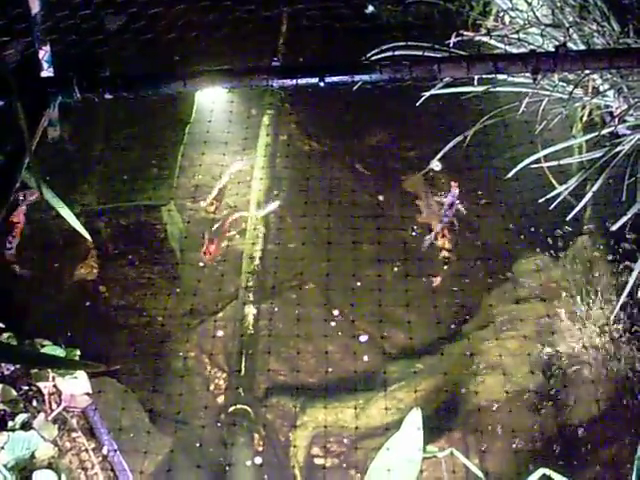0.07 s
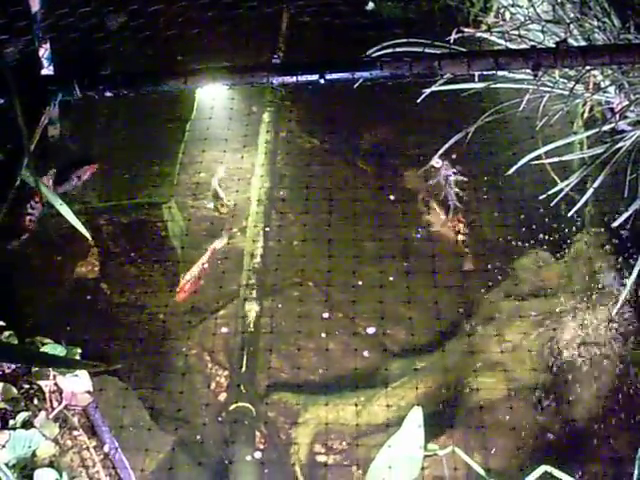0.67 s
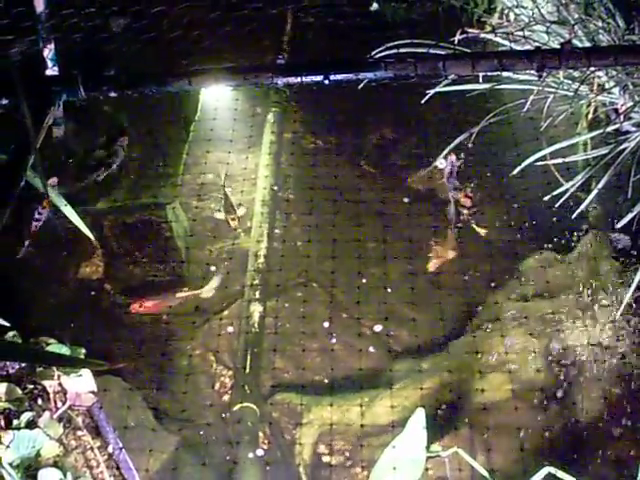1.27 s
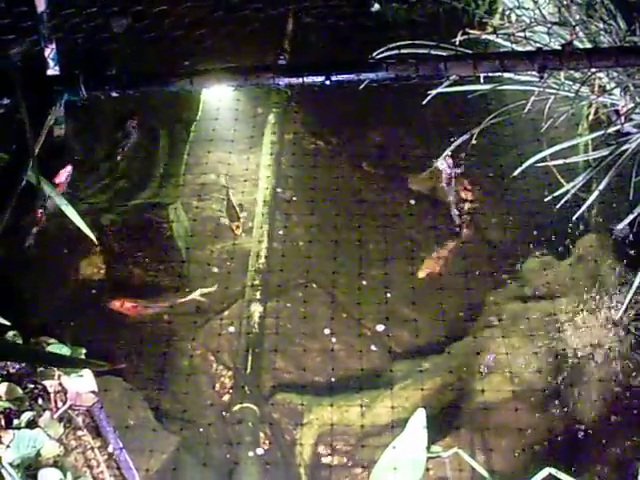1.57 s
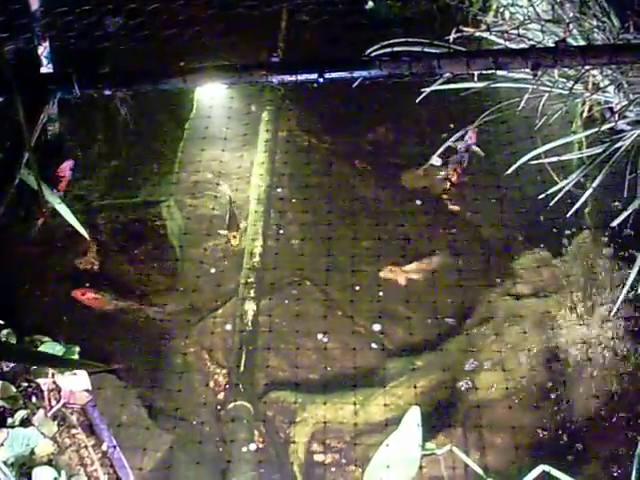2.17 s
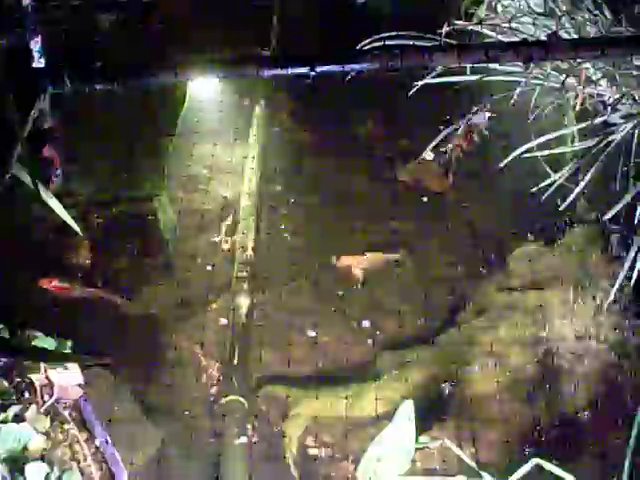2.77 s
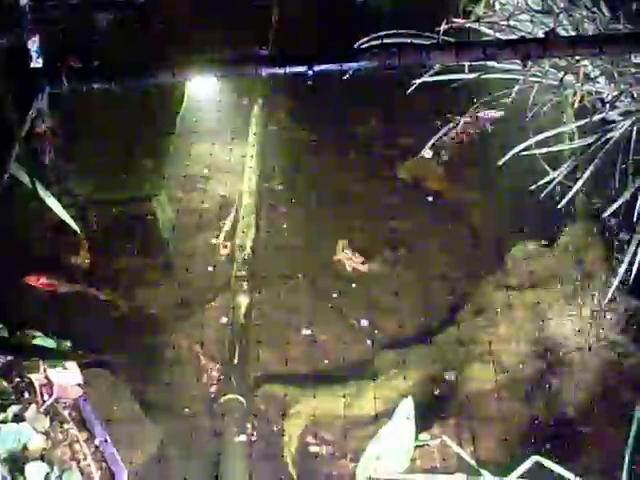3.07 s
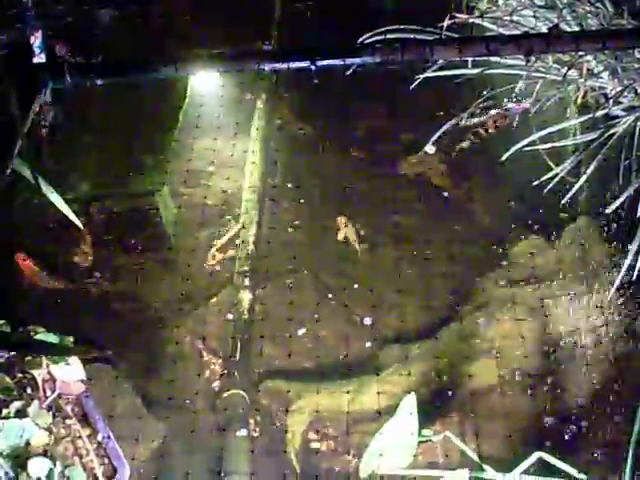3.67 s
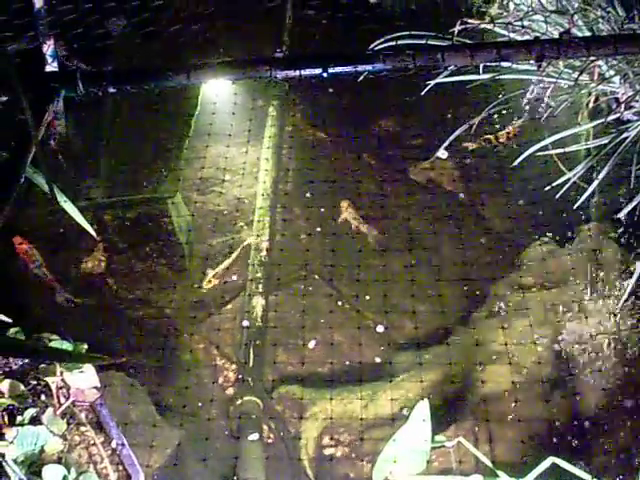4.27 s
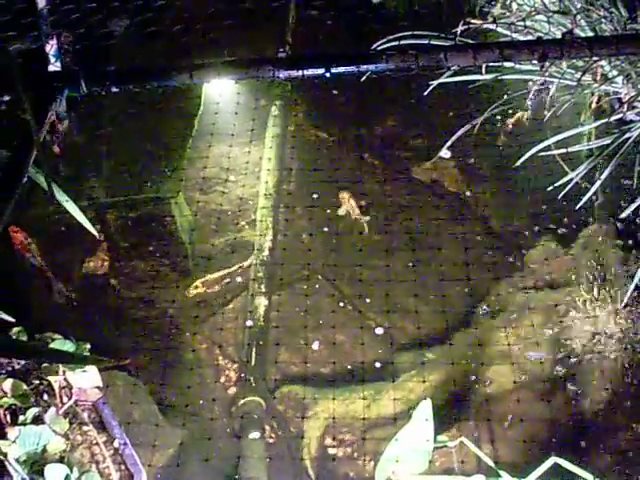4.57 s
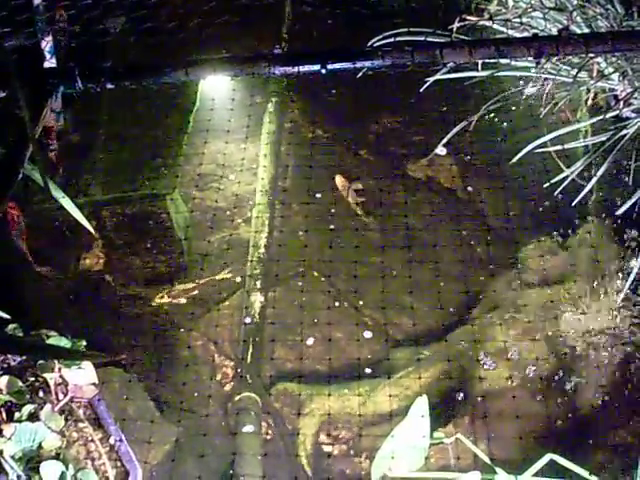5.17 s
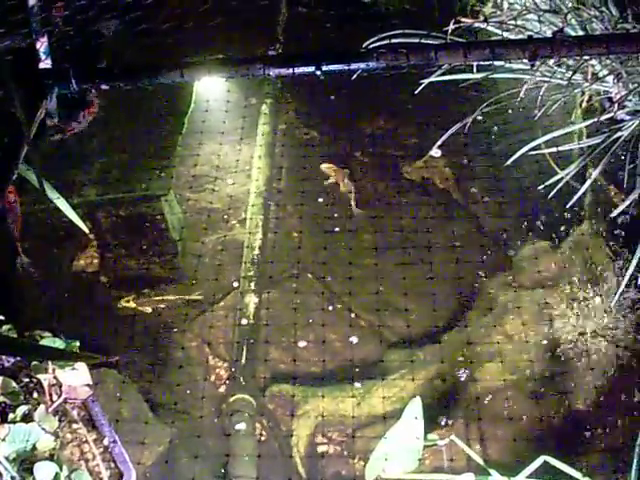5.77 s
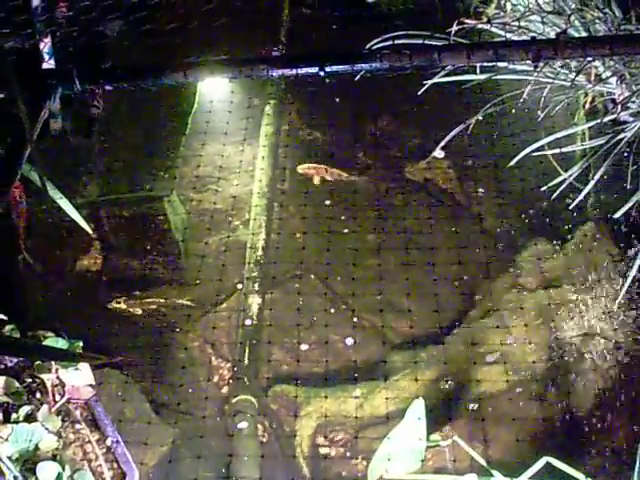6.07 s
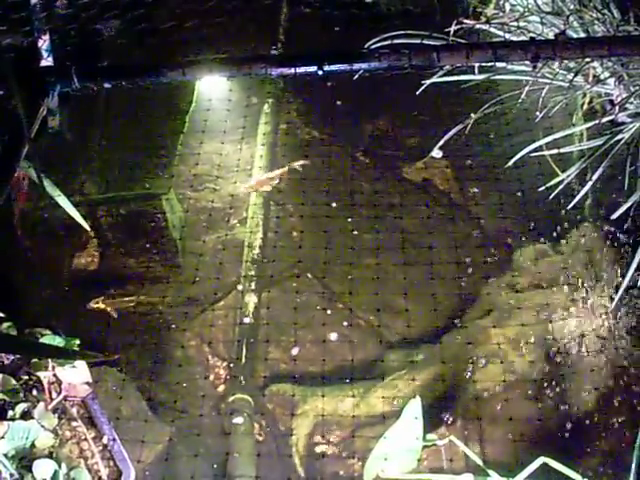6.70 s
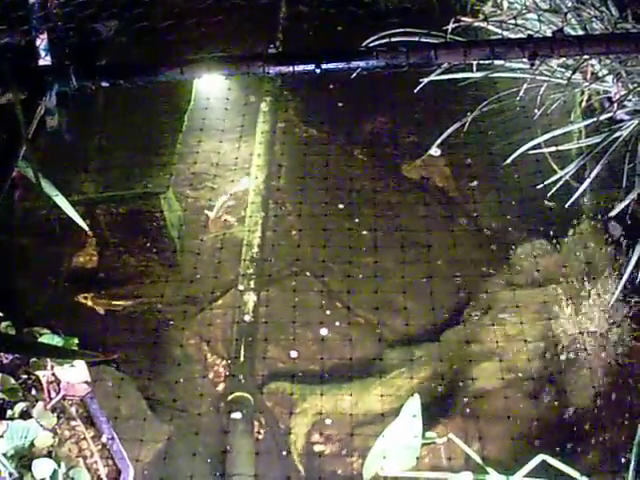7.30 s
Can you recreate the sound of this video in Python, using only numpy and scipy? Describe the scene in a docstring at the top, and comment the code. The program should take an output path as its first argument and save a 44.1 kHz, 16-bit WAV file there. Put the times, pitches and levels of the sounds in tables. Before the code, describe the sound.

A frog calls at a garden pond at night, over the soft hiss of trickling water and the faint low hum and rumble of a pump. From the start to about 1.6 seconds it gives four harsh, pitched croaks, half a second apart, with softer croaks and thin, quiet moans between them. From about 1.9 seconds the calls turn into short, rough rattles, eight in all, roughly every half second, each closing in a brief whine. The last three, from 4 seconds, are a little louder, and the final one ends near 5.3 seconds. The calls have only a faint outdoor reflection. The water and pump rise a little around 4 seconds, then clearly from 6 seconds, as if the microphone were turned up. Sharp drips and small ringing bubbles stand out of the trickle until the end at about 7.3 seconds.

```python
"""A garden pond at night, where a frog calls over trickling water and the hum of a pump.
The frog's vocal folds, beating about 790 times a second, drive the resonances of its throat and body.
At first they lock into a subharmonic, repeating every second beat (a croak) or every third (a thin
moan); later they rattle in chaotic bursts that relax into a short whine. The water sounds by drop
impacts and ringing bubbles. Water and pump grow louder at the end as the recorder's gain rises."""
import sys
import numpy as np
from scipy import signal
from scipy.io import wavfile
from scipy.ndimage import uniform_filter1d

SR = 44100
rng = np.random.default_rng(int(sys.argv[2]) if len(sys.argv) > 2 else 0)


def bounce(signal):
    """Save signal as a 16-bit WAV file at the path given by the first command-line argument."""
    frames = np.transpose(np.atleast_2d(signal))
    limited = np.clip(frames, -1, 1)
    pcm = np.round(limited * 32767).astype(np.int16)
    wavfile.write(sys.argv[1], SR, pcm)


N = 323694
TIME = np.arange(N) / SR

# Clear croaks, softer low croaks and thin moans. Each row: start, locking and release of the folds
# in seconds, nominal pitch in Hz, level in dB.
CLEAR_CROAKS = [(-.04, 0.025, 0.099, 399, -27.5), (.491, 0.544, 0.62, 401, -26.5),
                (1.029, 1.079, 1.154, 400, -26), (1.5, 1.553, 1.626, 400.7, -27)]
SOFT_CROAKS = [(.19, .228, 0.334, 378.5, -33), (.722, .768, .864, 378.2, -33)]
THIN_MOANS = [(.335, .352, 0.47, 267.6, -44), (.862, .882, .98, 271.6, -45.5),
              (.95, .985, 1.04, 255.7, -45.5), (1.255, 1.322, 1.42, 273.8, -45.5),
              (1.77, 1.8, 1.875, 271.3, -47), (2.215, 2.288, 2.37, 269.7, -46.5)]
# Rattling calls. Each row: start and length in seconds, nominal bursts per second, relative level in dB,
# starting pitch of the closing whine in Hz.
RATTLE_CALLS = [(1.901, 0.15, 54.8, -29.5, 810), (2.349, 0.17, 50, -29, 850), (2.737, 0.15, 48, -30.5, 830),
                (3.129, 0.17, 52.2, -31, 833), (3.563, 0.19, 50, -31.5, 819), (3.96, 0.17, 51.8, -25, 824),
                (4.444, 0.19, 50.3, -27.5, 824), (5.08, 0.19, 50.6, -26, 816)]
# Soft hums around the low croaks. Each row: start and length in seconds, pitch in Hz, level in dB.
FOLD_HUMS = [(0.176, 0.066, 750, -49.5), (0.332, 0.11, 747, -50.5), (0.708, .07, 754, -47.5),
             (0.848, 0.081, 747, -57)]
# Grunts that open some moans. Each row: start and length in seconds, relative level in dB.
SOFT_GRUNTS = [(0.925, 0.043, -57), (1.25, 0.063, -50), (2.213, 0.063, -51.5)]
# Spectra of the voices. Each row: harmonic number, relative level in dB.
CLEAR_SPECTRUM = [(1, -40.5), (2, -18.5), (3, -18.5), (4, -20), (5, -27.5), (6, -6), (7, 3), (8, -17.5),
                  (9, -7.5), (10, -25.5), (11, -21), (12, -19), (13, -21.5), (14, -26.5), (15, -22),
                  (16, -22.5), (17, -18.5), (18, -24), (19, -25), (20, -63.5), (21, -34.5)]
SOFT_SPECTRUM = [(1, -38), (2, -9), (3, -11), (4, -25), (5, -21), (6, -3), (7, 3), (8, -9.5), (9, -13.5),
                 (10, -30), (11, -15.5), (12, -24), (13, -23), (14, -26), (15, -34.5), (16, -16), (17, -24),
                 (18, -35), (19, -34), (20, -35)]
MOAN_SPECTRUM = [(1, -38.5), (2, -17.5), (3, 4.5), (4, -6), (5, -18.5), (6, -12.5), (7, -11.5), (8, -1.5),
                 (9, -13.5), (10, 1.5), (11, 3.5), (12, -7), (13, -16), (14, -8), (15, -35), (16, -16),
                 (17, -15), (18, -21.5), (19, -48.5), (20, -39), (21, -38.5), (22, -14), (23, -45),
                 (24, -15), (25, -9), (26, -51), (27, -31)]
WHINE_SPECTRUM = [(1, -5), (2, 1.5), (3, 7), (4, 1), (5, -26.5), (6, -6), (7, -16.5), (8, -4.5), (9, -35)]
# Tones held through a rattle. Each row: multiple of half the fold rate, relative level in dB.
HELD_SPECTRUM = [(2, -2), (3, -13), (4, -6.5), (6, -1.5), (7, 3.5), (9, -3.5), (17, -8.5)]
# Stationary resonances of throat and body. Each row: centre in Hz, width in Hz, gain in dB.
BODY_RESONANCES = [(815, 150, -18), (1000, 300, -9), (1300, 330, -16), (1585, 170, -17), (2360, 240, -9),
                   (2740, 220, -3), (3000, 300, -16), (3620, 240, -10), (4650, 700, -22), (5900, 900, -21),
                   (6700, 240, -14), (7400, 450, -21)]
# Level of the water and pump hum; both grow louder together as the recorder's gain rises.
# Each row: time in seconds, relative level in dB.
BACKGROUND_LEVEL = [(0, -9.5), (2, -9.5), (3.5, -11), (4.2, -5), (5.5, -5.5), (6.1, 4), (6.8, 5.5),
                    (7.34, 8.5)]
# Spectra of the water's wash, its splashes and the rumble. Each row: frequency in Hz, gain in dB.
WASH_SPECTRUM = [(90, -9), (190, 7), (300, 3), (470, 7), (650, 0.5), (900, 1.5), (1300, -0.5), (1600, -1.5),
                 (3150, -1), (4400, -5.5), (4900, 0), (5500, 0), (7400, 2), (8700, -18)]
SPLASH_SPECTRUM = [(300, -11), (500, -0.5), (1000, 0), (1300, -4), (1650, 0.5), (1900, -4), (2700, 0.5),
                   (3200, -4.5), (3800, 2.5), (4400, -3), (4850, 5), (5500, -7.5), (7300, -1.5),
                   (8500, -10.5)]
RUMBLE_SPECTRUM = [(15, -5.5), (30, 4), (70, -2.5), (150, -8.5), (300, -19), (600, -39.5), (1500, -49)]
# Large drops. Each row: start in seconds, relative peak level in dB, resonance in Hz.
LARGE_DROPS = [(1.2435, -44, 2260), (2.1226, -46, 3220), (2.6103, -42, 4800), (3.3502, -43, 4820),
               (4.9594, -37, 1640), (5.4215, -43, 5270), (5.5997, -39, 3670), (5.77, -37, 3600),
               (6.0739, -30, 2790), (6.1556, -30.5, 3700), (6.341, -26, 4900), (6.5635, -29.5, 6450),
               (6.9102, -30.5, 2050), (7.1026, -27.5, 1620), (7.2474, -25, 4870)]
# Single bubbles. Each row: start in seconds, pitch in Hz, level in dB, time to decay 60 dB in seconds.
RINGING_BUBBLES = [(3.85, 546, -49.5, 0.15), (4.353, 1590, -28.5, 0.013), (4.956, 1630, -39, 0.022),
                   (5.494, 6160, -44, 0.13), (5.55, 510, -36, 0.036), (6.084, 6160, -42, 0.061),
                   (6.162, 454, -37, 0.079), (6.17, 743, -30, .032), (6.252, 2810, -34, .034),
                   (6.5, 2210, -28.5, 0.013), (6.82, 2190, -35, .025), (6.912, 2030, -33.5, 0.035),
                   (7.06, 466, -31, 0.088), (7.1, 1520, -36, .055), (7.222, 4280, -36, .048),
                   (7.265, 480, -32, 0.035)]
# Hum of the pump. Each row: multiple of the mains frequency, relative level in dB.
PUMP_HARMONICS = [(2, -53.5), (3, -73), (4, -60.5), (6, -60.5), (8, -69), (16, -69.5)]


def locked_calls(calls, spectrum, waver, hoarse, scoop, sag_per_s, bloom, onset_db, fade_db_per_s,
                 release_db_per_s, creak_db, shut_hz, open_hz, settle_s=0.016, lock_s=0.036, sac_hz=2930):
    """Mode locking: on one push of air the folds creak, lock into a periodic tone, then creak again."""
    out = np.zeros(N)
    for start, lock, release, hz, db in calls:
        t = start + TIME[:SR // 4]
        swell = np.clip((t - start) / (lock - start), 0, 1)
        held_s, released_s = np.maximum(t - lock, 0), np.maximum(t - release, 0)
        fade_db = fade_db_per_s * held_s + release_db_per_s * released_s
        level = amp(db + onset_db * (1 - swell) ** 2 - fade_db)
        locked = ramp(t - lock, lock_s) * ramp(release - t, lock_s)
        loose = np.exp(-held_s / settle_s)
        pitch = hz * (1 - scoop * loose - sag_per_s * held_s)  # scoops up, then sags
        tone = harmonics(pitch, spectrum, waver + hoarse * loose)
        arch = np.sin(np.pi * np.minimum(held_s / (release - lock), 1)) ** 2
        tone += bloom * (arch - 0.5) * resonate(tone, sac_hz, 500)  # brightest in mid-call
        knocks = amp(creak_db) * creak(t, shut_hz + (open_hz - shut_hz) * swell)
        add(out, start, level * (np.sqrt(locked) * tone + np.sqrt(1 - locked) * knocks))
    return out


def rattles(fold_hz=784.9, gain_db=1.04, onset_db=-15, attack_s=0.019, fade_db=-15, release_s=0.012,
            swell_s=0.12, held_db=-10, held_depth=0.5, flutter_db=2, whine_db=-15, whine_lead_s=0.0055):
    """Chaotic oscillation: irregular fold pulses come in bursts over held tones, and a whine follows."""
    out, t = np.zeros(N), TIME[:SR // 4]
    main_hz = np.interp(t, [0, swell_s], [2488, 2810])  # the resonance climbs as the throat swells
    body_db = np.interp(t, [0, swell_s], [-7, 0])
    for start, length, per_s, db, whine_hz in RATTLE_CALLS:
        push = amp(onset_db * np.exp(-t / attack_s) + fade_db * (t / length) ** 4)
        push *= ramp(length + release_s / 2 - t, release_s)
        gate = bursts(t, per_s)
        hz = fold_hz * (1 + 0.0027 * drift(40, size=len(t)))
        pulses = fold_pulses(hz, jitter=0.069, spread_db=6)
        chaos = throat(pulses, main_hz, body_db, main_width=250, steady_s=0.0075, lowest_hz=916)
        held_level = amp(held_db + flutter_db * drift(150, size=len(t)))
        held = held_level * harmonics(hz / 2, HELD_SPECTRUM, waver=0.011)
        add(out, start, amp(db + gain_db) * push * (gate * chaos + gate ** held_depth * held))
        add(out, start + length - whine_lead_s, amp(db + whine_db) * whine(whine_hz))
    return out


def bursts(t, per_s, slowing=0.011, hurry_s=0.003, rise_s=0.0019, hold_s=0.02, ring_db=-11, ring_s=0.075):
    """Amplitude modulation: the folds pass air in slowing bursts that open sharply, hold and ring off."""
    k = np.arange(44)
    opens = k * (1 + slowing * k) / per_s - hurry_s * (k > 0)  # the first gap is shortened
    age = np.maximum(t - opens[opens < t[-1], None], 0)
    hold = np.exp(-(age / hold_s) ** 4)
    ring = amp(ring_db) * np.exp((hold_s - age) / ring_s)
    shape = np.minimum(age / rise_s, 1) * np.maximum(hold, ring)
    strength = amp(rng.standard_normal(len(k)))[:len(age), None]
    return (shape * strength).max(0)


def creak(t, main_hz, knock_hz=135, chatter_hz=785, chatter_db=-10):
    """Impulse excitation: unlocked folds ring the throat with slow, hard knocks over a weak chatter."""
    knocks = fold_pulses(knock_hz * (1 + 0.13 * drift(30, size=len(t))), jitter=0.06, spread_db=1)
    chatter = fold_pulses(chatter_hz * (1 + 0.0092 * drift(40, size=len(t))), jitter=0.057, spread_db=0)
    return throat(knocks + amp(chatter_db) * chatter, main_hz, body_db=-2.5, main_width=280, steady_s=0.011)


def whine(hz, length_s=0.034, sag=0.055, fade_db=10):
    """Free oscillation: as the pressure dies the folds swing on and the pitch sags."""
    t = np.arange(0, length_s, 1 / SR)
    progress = t / length_s
    level = amp(-fade_db * progress ** 2) * fades(t, 0.006, 0.004)
    return level * harmonics(hz * (1 - sag * progress), WHINE_SPECTRUM, waver=0.017)


def croak_tails(gain_db=-18, lead_s=0.011):
    """Period doubling ends: a clear croak closes with a faint whine at the full rate of the folds."""
    out = np.zeros(N)
    for _, _, release, hz, db in CLEAR_CROAKS:
        add(out, release - lead_s, amp(db + gain_db) * whine(2 * hz, length_s=0.04, sag=0.025, fade_db=7))
    return out


def hums():
    """Nearly sinusoidal motion: folds that barely touch give an almost pure tone."""
    out = np.zeros(N)
    for start, length, hz, db in FOLD_HUMS:
        t = np.arange(0, length, 1 / SR)
        tone = harmonics(np.full(len(t), hz), [(1, 0.0043), (2, -18)], waver=0.011)
        add(out, start, amp(db) * fades(t, 0.022, 0.025) * tone)
    return out


def grunts(start_hz=1950, end_hz=2650, low_hz=1050, low_db=-2, gain_db=4):
    """Formant glide: loose folds chatter through a resonance that climbs as the throat swells."""
    out = np.zeros(N)
    chatter = fold_pulses(np.full(N, 420.0), jitter=0.069, spread_db=3.5)
    for start, length, db in SOFT_GRUNTS:
        t = np.arange(0, length, 1 / SR)
        pulses = chatter[round(start * SR):][:len(t)]
        voice = resonate(pulses, np.geomspace(start_hz, end_hz, num=len(t)), 500)
        voice += amp(low_db) * resonate(pulses, low_hz, 400)
        add(out, start, amp(db + gain_db) * unit_rms(voice) * fades(t, 0.04, 0.012))
    return out


def harmonics(hz, spectrum, waver, shimmer=9, lag_s=0.0012):
    """Fourier series: periodic folds give wavering harmonics; strong ones, near resonances, lag a little."""
    jitter, flutter = unit_rms(uniform_filter1d(rng.standard_normal((2, len(hz))), size=110))
    cycles = np.cumsum(hz * (1 + waver * jitter)) / SR
    lag = lag_s * hz.mean()
    tone = sum(amp(db) * np.cos(2 * np.pi * (k * cycles - lag * amp(db))) for k, db in spectrum)
    return unit_rms(tone * (1 + shimmer * waver * flutter))


def fold_pulses(rate_hz, jitter, spread_db):
    """Jitter and shimmer: fold pulses vary in timing, by a share of the period, and in strength."""
    cycles = np.floor(np.cumsum(rate_hz) / SR)
    due = np.flatnonzero(np.diff(cycles, prepend=-1))
    late, strength = rng.standard_normal((N // 20, 2))[:len(due)].T
    out = np.zeros(len(rate_hz))
    at = np.clip(due + late * jitter * SR / rate_hz[due], 0, len(out) - 1).astype(int)
    out[at] = amp(spread_db * np.minimum(strength, 1.6))
    return out


def throat(pulses, main_hz, body_db, main_width, steady_s, lowest_hz=775):
    """Source and filter: pulses ring a moving resonance and the body; air pressure steadies their power."""
    body = sum(amp(db) * resonate(pulses, hz, width) for hz, width, db in BODY_RESONANCES)
    voice = resonate(pulses, main_hz, main_width) + amp(body_db) * body
    voice = signal.sosfilt(signal.butter(8, lowest_hz, "highpass", fs=SR, output="sos"), voice)
    window = signal.windows.hann(int(steady_s * SR))
    power = abs(signal.oaconvolve(voice ** 2, window / window.sum(), "same"))
    return voice / np.sqrt(power + 0.075 * np.mean(voice ** 2))


def garden_scatter(x, t60=0.26, wet_db=-21):
    """Diffuse reflection: plants and stones return a faint, exponentially decaying tail."""
    t = TIME[:SR // 3]
    tail = rng.standard_normal(len(t)) * amp(-60 * t / t60) * (t > 0.008)
    return x + amp(wet_db) * signal.oaconvolve(x, tail / np.linalg.norm(tail))[:N]


def stream(base_db=-49.5, wash_db=-1.5, spray_db=-6, drips_db=-5, fizz_db=-10, cycles=24, drip_s=0.0049):
    """Superposition of random events: falling water sums to a wash, fine spray, drips and small bubbles."""
    wash = unit_rms(colour(rng.standard_normal(N), WASH_SPECTRUM)) * amp(1.8 * drift(25))
    ticks = impacts(500, spread_db=0.5) * rng.choice([-1, 1], N)
    spray = unit_rms(colour(ticks, SPLASH_SPECTRUM))
    drip_envelope = signal.lfilter([1], [1, -np.exp(-1 / (drip_s * SR))], impacts(32, spread_db=3.5))
    drips = unit_rms(colour(drip_envelope * rng.standard_normal(N), SPLASH_SPECTRUM))
    fizz = np.zeros(N)
    for hz in np.geomspace(420, 7200, num=40):
        ringing = signal.oaconvolve(impacts(12, spread_db=10), bubble(hz, cycles / hz))[:N]
        fizz += unit_rms(ringing) * hz ** 0.091
    water = amp(wash_db) * wash + amp(spray_db) * spray + amp(drips_db) * drips
    water += amp(fizz_db) * unit_rms(fizz)
    return amp(base_db + np.interp(TIME, *np.transpose(BACKGROUND_LEVEL))) * water


def drops(ring_db=3, gain_db=3, slap_s=0.0031):
    """Impact and air entrainment: large drops slap the pond, and trapped bubbles ring."""
    out, t = np.zeros(N), TIME[:SR // 25]
    for start, db, hz in LARGE_DROPS:
        slap = colour(rng.standard_normal(len(t)) * np.exp(-t / slap_s), SPLASH_SPECTRUM)
        slap += amp(ring_db) * resonate(slap, hz, 700)
        add(out, start, amp(db + gain_db) * slap / abs(slap).max())
    for start, hz, db, t60 in RINGING_BUBBLES:
        add(out, start, amp(db) * bubble(hz, t60))
    return out


def bubble(hz, t60, glide=0.0093):
    """Damped oscillation: a bubble rings and rises in pitch as it nears the surface."""
    t = np.arange(0, t60, 1 / SR)
    envelope = amp(-60 * t / t60) * (1 - np.exp(-t * hz / 2))
    return envelope * np.sin(2 * np.pi * hz * t * (1 + glide * t / t60))


def impacts(per_s, spread_db):
    """Shot noise: impacts arrive independently, a few of them large."""
    out = np.zeros(N)
    at = np.flatnonzero(rng.random(N) < per_s / SR)
    out[at] = amp(spread_db * np.minimum(rng.exponential(1, N)[at], 4))
    return out


def pump(mains_hz=60, rumble_db=-52.5, hum_share=0.83, rumble_share=0.54):
    """Forced vibration: the pump hums at mains harmonics over a rumble; both grow louder with the water."""
    level_db = np.interp(TIME, *np.transpose(BACKGROUND_LEVEL))
    hum = sum(amp(db + drift(17)) * np.sin(2 * np.pi * (k * mains_hz * TIME + rng.random()))
              for k, db in PUMP_HARMONICS)
    rumble = unit_rms(colour(rng.standard_normal(N), RUMBLE_SPECTRUM, size=8192))
    return amp(hum_share * level_db) * hum + amp(rumble_db + rumble_share * level_db) * rumble


def resonate(x, hz, width):
    """Resonance: a double pole passes a band, with unit gain at a centre that may glide."""
    carrier = np.exp(2j * np.pi * np.cumsum(hz * np.ones(len(x))) / SR)
    r = np.exp(-np.pi * width / SR)
    baseband = signal.lfilter([(1 - r) ** 2], [1, -2 * r, r * r], x / carrier + 1e-18)
    return 2 * (carrier * baseband).real


def colour(x, points, size=2048):
    """Minimum-phase filtering: a causal response follows the given (Hz, dB) points."""
    hz, db = np.transpose(points)
    bin_hz = abs(np.fft.fftfreq(size, 1 / SR))
    log_gain = np.log(amp(np.interp(np.log(bin_hz + 1), np.log(hz + 1), db)))
    taps = np.fft.ifft(np.exp(np.conj(signal.hilbert(log_gain)))).real
    return signal.oaconvolve(x, taps)[:len(x)]


def drift(per_s, size=N):
    """Slow noise: straight lines join per_s random values a second."""
    return np.interp(TIME[:size] * per_s, np.arange(size), rng.standard_normal(size))


def fades(t, rise, fall):
    """A window over the times t with quarter-sine ends."""
    return np.sin(np.pi / 2 * np.clip(np.minimum((t - t[0]) / rise, (t[-1] - t) / fall), 0, 1))


def ramp(t, length):
    """A smooth step from 0 to 1, centred on t = 0."""
    return 0.5 + 0.5 * np.sin(np.pi * np.clip(t / length, -0.5, 0.5))


def amp(db):
    """The amplitude ratio of a level in decibels."""
    return 10 ** (np.asarray(db) / 20)


def unit_rms(x):
    """Normalisation to an rms of 1."""
    return x / np.sqrt(np.mean(x ** 2) + 1e-20)


def add(mix, start, sound):
    """Superposition: a sound joins the mix at its start in seconds."""
    at = round(start * SR)
    sound = sound[max(-at, 0):]
    part = mix[max(at, 0):][:len(sound)]
    part += sound[:len(part)]


def scene():
    """Linear superposition: the frog and its reflections add to the water and the pump."""
    frog = locked_calls(CLEAR_CROAKS, CLEAR_SPECTRUM, waver=0.003, hoarse=0.03, scoop=0.022,
                        sag_per_s=0.15, bloom=0.1, onset_db=-11, fade_db_per_s=60.5,
                        release_db_per_s=567.5, creak_db=-2.5, shut_hz=2270, open_hz=2747)
    frog += locked_calls(SOFT_CROAKS, SOFT_SPECTRUM, waver=0.0053, hoarse=0.0094, scoop=0.03,
                         sag_per_s=0.015, bloom=0.5, onset_db=-16.5, fade_db_per_s=39,
                         release_db_per_s=400, creak_db=-4.5, shut_hz=2380, open_hz=2500, settle_s=0.026)
    frog += locked_calls(THIN_MOANS, MOAN_SPECTRUM, waver=0.0065, hoarse=0.041, scoop=0.02,
                         sag_per_s=0.33, bloom=1.9, onset_db=-18.5, fade_db_per_s=24,
                         release_db_per_s=400, creak_db=-1.5, shut_hz=2350, open_hz=2550)
    frog += croak_tails() + hums() + grunts() + rattles()
    return (garden_scatter(frog) + stream() + drops() + pump())[None]


def record(dry):
    """Band limiting: a small microphone dips near 8 kHz, and a low-pass removes the top treble."""
    dull = colour(dry[0], [(20, 0.5), (7450, 1.5), (7950, -7.0), (8400, -2.0), (9000, 3.5)])
    lowpass = signal.firwin(301, cutoff=8700, window=("kaiser", 9), fs=SR)
    return signal.oaconvolve(dull, lowpass, "same")[None]


dry = scene()
out = record(dry)
bounce(out)
```